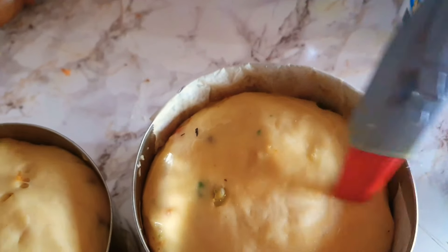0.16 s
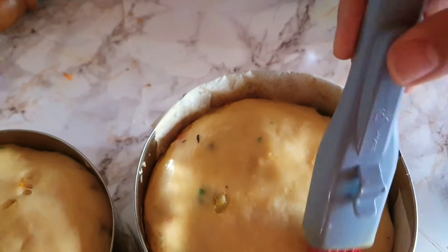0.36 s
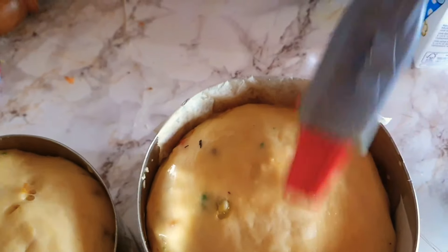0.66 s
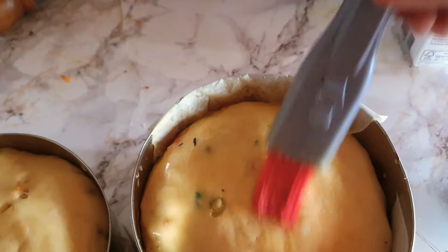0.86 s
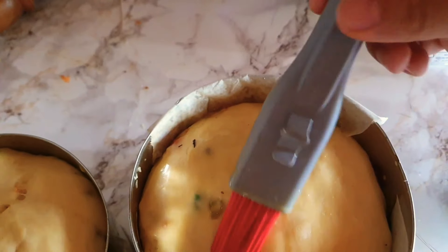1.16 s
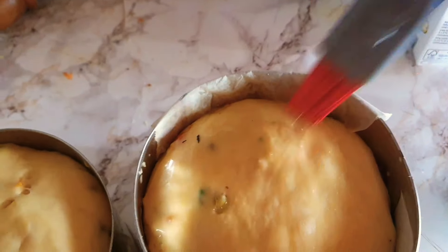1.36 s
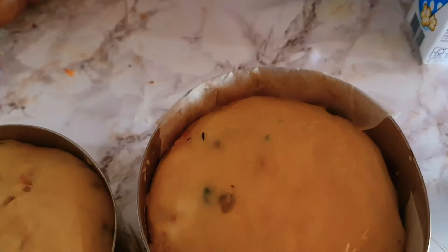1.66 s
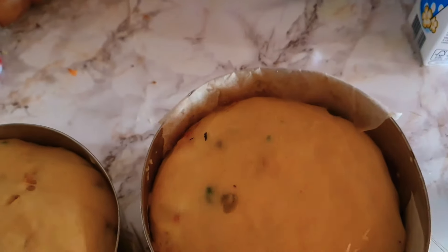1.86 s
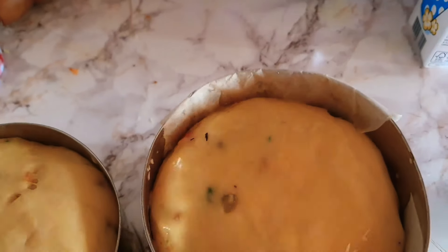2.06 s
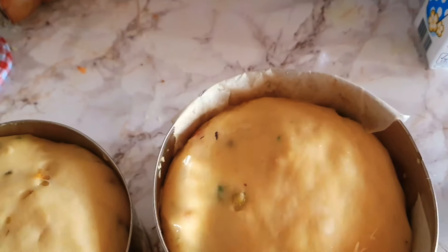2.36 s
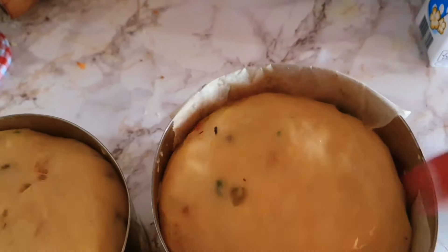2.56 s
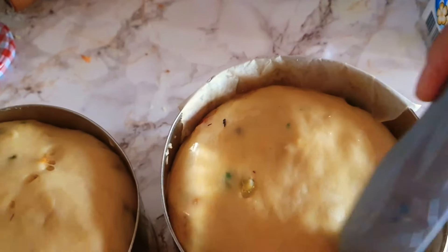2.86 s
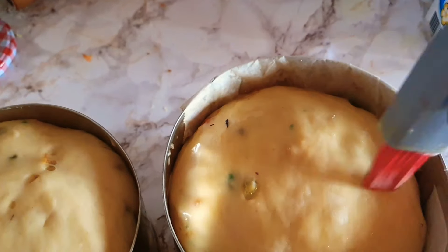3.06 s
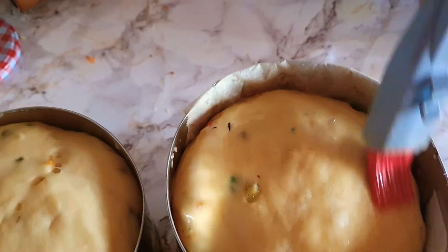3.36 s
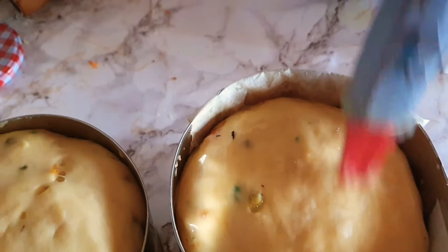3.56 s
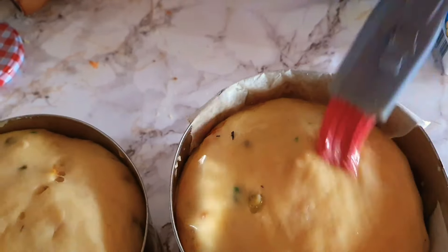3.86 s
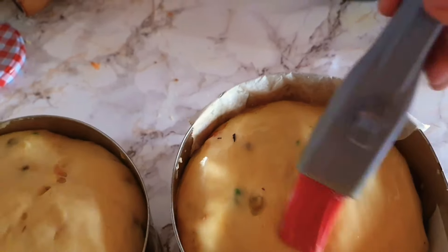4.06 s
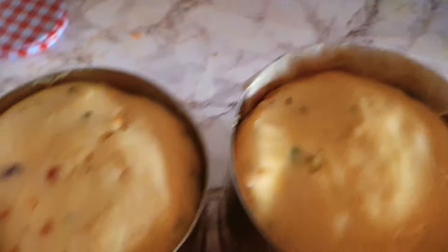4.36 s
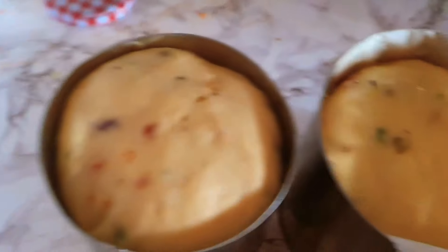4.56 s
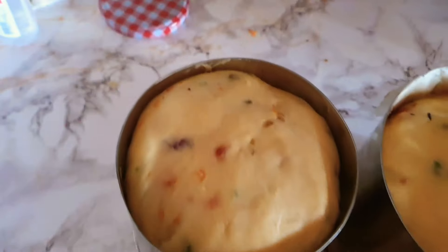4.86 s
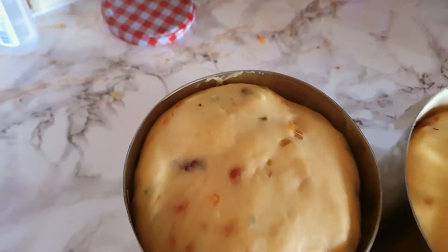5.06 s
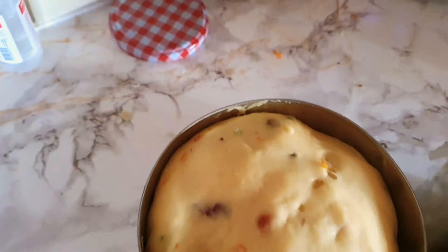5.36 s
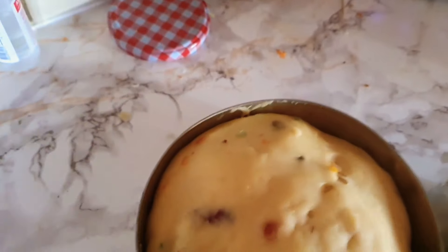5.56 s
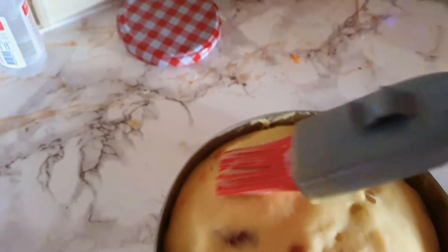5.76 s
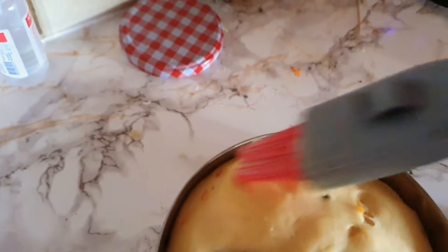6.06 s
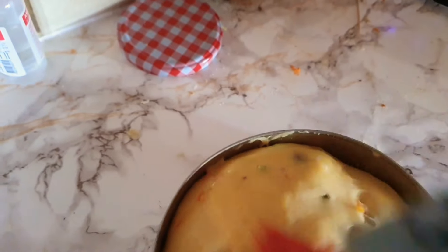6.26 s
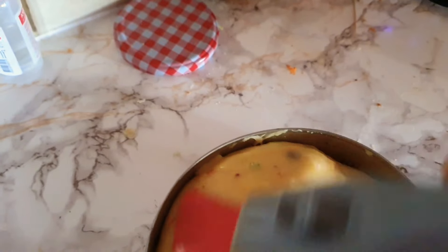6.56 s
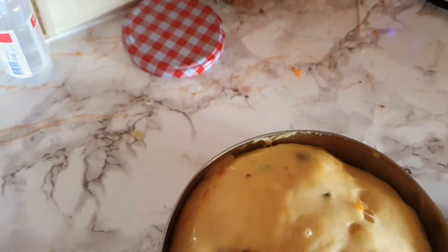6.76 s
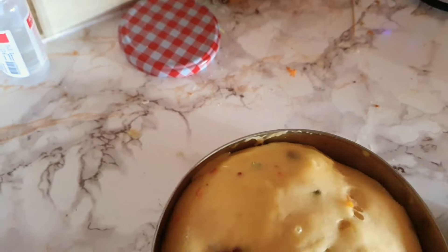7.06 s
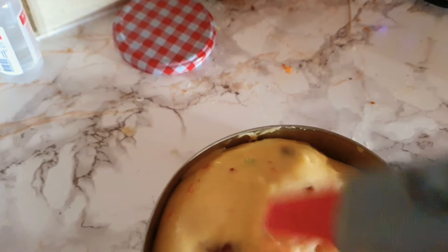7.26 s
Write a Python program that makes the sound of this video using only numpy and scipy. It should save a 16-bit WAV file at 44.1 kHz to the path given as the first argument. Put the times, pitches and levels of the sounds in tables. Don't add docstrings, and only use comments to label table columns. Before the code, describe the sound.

A soft brush strokes and dabs dough with faint hisses, paper rustles and tin ticks, over a low fridge hum, with one hard clank on stone.

```python
import sys
import numpy as np
from scipy import signal
from scipy.fft import rfft, irfft
from scipy.io import wavfile
from scipy.ndimage import uniform_filter1d

SR = 44100
rng = np.random.default_rng(int(sys.argv[2]) if len(sys.argv) > 2 else 0)


def voltage_ratio(decibels):
    exponent = np.asarray(decibels, float) / 20
    return 10 ** exponent


def output_pcm(signal):
    pcm = np.clip(np.atleast_2d(signal).T, -1, 1) * 32767
    wavfile.write(sys.argv[1], SR, np.round(pcm).astype(np.int16))


N = 325899
TIME = np.arange(N) / SR
LEFT_LAG = 10


def unit(x):
    return x / np.sqrt(np.mean(x ** 2))


def colour(x, points):
    hz = np.log(np.maximum(np.arange(x.shape[-1] // 2 + 1) * SR / x.shape[-1], 1))
    f, db = np.transpose(points)
    gain = voltage_ratio(np.interp(hz, np.log(f), db, -200, -200))
    return irfft(rfft(x) * gain, x.shape[-1])


def pair(likeness):
    f, c = np.transpose(likeness)
    hz = np.arange(N // 2 + 1) * SR / N
    c = np.clip(np.interp(np.log(hz + 1), np.log(f), c), 0, 1)
    mid, side = rfft(rng.standard_normal((2, N)))
    both = np.sqrt(1 + c) * mid + np.sqrt(1 - c) * side * np.array([[1], [-1]])
    return irfft(both, N) / np.sqrt(2)


def band(x, hz, width_hz, order=1):
    edges = [hz - width_hz / 2, hz + width_hz / 2]
    return signal.sosfilt(signal.butter(order, edges, "band", fs=SR, output="sos"), x)


def walk(rate):
    k = int(SR / rate)
    held = np.repeat(rng.standard_normal(N // k + 1), k)
    return uniform_filter1d(uniform_filter1d(held, k), k)[:N]


def pan(db):
    return voltage_ratio(np.array([db, -db]) / 2)


def add(out, s, sound):
    i = int(s * SR)
    out[:, i:i + sound.shape[1]] += sound[:, :N - i]


def fade(t, t60):
    return np.exp(-np.log(1000) * t / t60)


def steady(x, share):
    swings = np.abs(signal.hilbert(x))
    return unit(x / swings ** np.clip(share, 0, 1))


# (frequency [Hz], width [Hz], level [dB])
ROOM_NOTES = [(58.1, 17.5, -60.5), (73.1, 11.3, -48.5), (254.4, 33.7, -66), (384, 27.8, -64),
              (453, 18, -72.5), (599.8, 51, -69)]
# (frequency [Hz], level [dB])
AIR_COLOUR = [(15, -6.5), (35, -6), (52, -3), (130, -6), (300, -16), (750, -22), (1100, -38.5), (2500, -37),
              (6500, -50.5), (7600, -57.5), (11000, -51), (16000, -53)]
# (frequency [Hz], likeness [0-1])
ROOM_LIKENESS = [(30, 0.84), (70, 0.94), (200, 0.64), (400, 0.86), (700, 0.48), (1300, 0.05), (16000, 0)]
# (time [s], level [dB])
DRONE_LEVEL = [
    (0, -1),
    (2.5, -0.5),
    (4.8, -1),
    (5.6, -9),
    (7.39, -5.5),
]
HUM_HZ, HUM_DB, HUM_PAN_DB = 101.2, -49, 3
SHAFT_HZ, SHAFT_DB, SHAFT_PAN_DB = 56.74, -51.5, -3
AIR_DB = -57


def fridge():
    hum_hz = HUM_HZ + 0.615 * walk(2.767) + 0.5 * walk(22)
    hum = np.sqrt(2) * np.sin(2 * np.pi * np.cumsum(hum_hz) / SR)
    hum = hum * voltage_ratio(HUM_DB + 1.7 * walk(19) + 0.26 * walk(2.7))
    shaft_hz = SHAFT_HZ + 0.61 * walk(3.06) + 4.02 * walk(15)
    shaft = np.sqrt(2) * np.sin(2 * np.pi * np.cumsum(shaft_hz) / SR)
    shaft = shaft * voltage_ratio(SHAFT_DB + 1.5 * walk(6.6)) * pan(SHAFT_PAN_DB)[:, None]
    noise = pair(ROOM_LIKENESS)
    notes = [voltage_ratio(db) * unit(band(noise, hz, width, order=2)) for hz, width, db in ROOM_NOTES]
    notes[1] = voltage_ratio(ROOM_NOTES[1][2]) * steady(notes[1], 0.59)
    notes[3] = notes[3] * voltage_ratio(np.interp(TIME, *np.transpose(DRONE_LEVEL)))
    air = voltage_ratio(AIR_DB) * unit(colour(pair(ROOM_LIKENESS), AIR_COLOUR))
    return (hum + sum(notes)) * pan(HUM_PAN_DB)[:, None] + shaft + air


def contact(s, db, swell, fall):
    return db - 20 * np.where(TIME < s, (s - TIME) / swell, (TIME - s) / fall)


# (peak time [s], level [dB], swell [s per 20 dB], fade [s per 20 dB], sizzle [dB])
BRUSH_SWIPES = [(.508, -76.5, 0.15, 0.08, 1.5), (.564, -64.5, 0.053, 0.042, -17),
                (.892, -66, 0.065, 0.035, -7), (.968, -75, 0.052, 0.031, -5),
                (1.222, -70.5, 0.12, 0.22, -20), (1.338, -57.5, 0.015, 0.02, -21),
                (2.21, -72.5, 0.05, .06, -9), (2.59, -64, 0.052, 0.073, -12),
                (3.008, -57, 0.039, 0.066, -26), (3.44, -39, 0.02, 0.053, -16),
                (5.42, -66, 0.072, 0.17, -32), (5.54, -75, 0.027, 0.46, -19),
                (5.742, -68.5, 0.097, 0.35, -44), (5.916, -53.5, 0.029, 0.032, -9),
                (6.13, -72.5, 0.037, 0.41, -8), (6.284, -58.5, 0.043, 0.096, -9.5),
                (6.628, -48, 0.078, 0.12, -11), (6.764, -55, 0.051, 0.022, -35),
                (6.96, -62, 0.043, 0.61, -32), (7.062, -55.5, 0.096, 0.085, 0),
                (7.186, -55, 0.044, 0.038, -14.5), (7.388, -75.5, 0.0062, 0.055, 0),
                (6.58, -80, 0.026, 0.12, 12), (3.05, -55.5, 0.032, 0.03, -26)]
# (peak time [s], level [dB], swell [s per 20 dB], fade [s per 20 dB], sizzle [dB])
PAPER_RUSTLES = [(.002, -39, 0.012, 0.042, -13), (.05, -38.5, 0.11, 0.014, -9), (.08, -51.5, .03, 0.1, -10),
                 (1.635, -44, 0.0021, 0.029, -18), (1.671, -46.5, 0.0098, 0.035, -13),
                 (1.86, -46, 0.0059, 0.019, -12), (1.87, -56.5, 0.0058, 0.066, -11),
                 (2.012, -63, .004, 0.14, -20), (2.076, -57, .004, 0.025, -45),
                 (2.69, -51, 0.0031, 0.37, -20), (2.715, -41, 0.017, 0.096, -14.5),
                 (2.744, -43.5, 0.011, 0.03, -14), (2.822, -49, 0.041, 0.004, -4.5),
                 (2.89, -96, 0.028, 0.12, 10), (2.972, -43, 0.027, 0.011, -9),
                 (3.515, -70.5, 0.02, 0.29, -19), (4.54, -63, 0.0028, 0.017, 15),
                 (4.595, -48.5, 0.041, 0.029, -4), (4.64, -61.5, 0.058, 0.52, -6.5),
                 (4.978, -59.5, 0.024, 0.067, -23), (5.008, -74, 0.026, 0.083, 4)]
SWIPE_BODY_DB, RUSTLE_BODY_DB = -4.5, -11
LIFT_S = 4.87


def touch():
    out = np.full((3, N), 1e-9)
    for table, body_db in ((BRUSH_SWIPES, SWIPE_BODY_DB), (PAPER_RUSTLES, RUSTLE_BODY_DB)):
        for s, db, swell, fall, sizzle_db in table:
            damped = 100 * np.clip(TIME - LIFT_S, 0, None) * (s < LIFT_S)
            part_db = np.array([[0], [sizzle_db], [body_db]])
            out += voltage_ratio(contact(s, db, swell, fall) - damped + part_db)
    return out


# (time [s], left minus right [dB], note of the hollow under it [Hz])
HAND_PATH = [(0, 8, 3056), (1.22, 19.5, 3450), (1.34, 10.5, 2600), (1.66, 0, 3075), (2.072, 15, 2790),
             (2.601, 8, 3360), (3.06, 6.5, 2440), (3.2, 19, 3000), (3.438, 10.5, 3290), (4.55, 8.5, 2607),
             (4.999, 14, 2760), (5.451, 11.5, 3370), (5.749, 18.5, 2700), (5.919, 26.5, 3000),
             (6.082, 24, 2565), (6.7, 14, 2922), (6.869, 14, 2600), (7.103, 17, 2893)]
# (frequency [Hz], level [dB])
RUB_COLOUR = [(1000, -67), (1700, -14), (2130, -3.5), (2340, -2.5), (2930, -5), (3910, -6), (5420, -12),
              (6420, -8), (7600, -27.5), (9880, -62), (16700, -120)]
# (frequency [Hz], level [dB])
SIZZLE_COLOUR = [(7000, -22), (8300, 6), (11000, 12), (14500, 5), (16000, -6)]
# (frequency [Hz], level [dB])
BODY_COLOUR = [(500, -20), (750, -4), (1100, 1.5), (1700, -3), (2300, -25)]
# (peak time [s], level [dB], swell [s per 20
# dB], fade [s per 20 dB])
SLEEVE_RUBS = [
    (3.13, -71, .15, 0.21),
    (4.788, -71, 0.039, 0.049),
    (5.74, -65, 0.034, 0.03),
    (6.11, -76, 0.03, 0.13),
    (6.25, -69, 0.093, 0.081),
    (6.55, -66, 0.042, 0.12),
    (6.89, -60.5, 0.023, 0.052),
    (2.049, -75, .04, 0.034),
]


def strokes():
    s, *columns = np.transpose(HAND_PATH)
    side, hollow_hz = (np.interp(TIME, s, column) for column in columns)
    level, sizzle, body = touch()
    clicks = (rng.random(N) < 400 / SR) * voltage_ratio(1.8 * rng.exponential(size=N)) * rng.standard_normal(N)
    hiss = pair([(500, 0.7), (3000, 0.6), (8000, 0.2)])
    slip = (hiss + 0.3 * unit(clicks)) * voltage_ratio(3 * walk(110))
    turn = 2 * np.pi * np.cumsum(hollow_hz) / SR
    slow = colour(rng.standard_normal((2, 2, N)), [(1, -5), (150, -8), (350, -18.5), (900, -18.5)])
    slow = slow + 0.52 * slow[:, :1]
    hollow = unit(slow[0] * np.cos(turn) + slow[1] * np.sin(turn))
    loud_db = 20 * np.log10(level) + 55.0
    bright_db = 20 * np.log10(sizzle / level) + 16.5
    share = np.clip(0.3 - 0.0058 * loud_db - 0.048 * bright_db, 0.12, 0.93)
    rub = np.sqrt(1 - share) * unit(colour(slip, RUB_COLOUR)) + np.sqrt(share) * hollow
    rub = level * rub * pan(side)
    rub = rub + sum(voltage_ratio(contact(*row)) for row in SLEEVE_RUBS) * hollow * pan(side)
    rub = rub + sizzle * voltage_ratio(2.2 * walk(40)) * unit(colour(slip, SIZZLE_COLOUR)) * pan(0.3 * side)
    rub = rub + body * unit(colour(slip, BODY_COLOUR)) * pan(0.45 * side)
    return np.array([np.roll(rub[0], LEFT_LAG), rub[1]]) * voltage_ratio(-5.5)


# (time [s], peak level [dB], pitch [Hz], ring time to -60 dB [s], left minus right [dB])
TIN_KNOCKS = [(0.014, -43, 950, 0.17, 0), (0.022, -38.5, 769, 0.063, 5), (0.039, -33.5, 734, 0.026, 0),
              (1.632, -43, 378, 0.021, 0), (1.668, -51, 359.5, 0.17, -1), (1.824, -43, 337, 0.097, 5),
              (1.854, -49, 722, 0.094, 4), (2.011, -40, 338, 0.081, 2), (2.012, -48.5, 696, 0.06, 13),
              (2.715, -38, 1114, 0.039, 5), (2.95, -32.5, 728, 0.028, 7.5), (3.433, -53, 905, 0.05, -12),
              (6.92, -101, 252, 0.08, -1.0)]


def knocks():
    out, t = np.zeros((2, N)), TIME[:8000]
    for s, db, hz, t60, side_db in TIN_KNOCKS:
        ring = np.sin(2 * np.pi * hz * t)
        ring = ring + 0.12 * np.sin(2 * np.pi * hz * 1.9 * t) * fade(t, t60)
        ring = ring + 0.35 * unit(band(rng.standard_normal(len(t)), 375, 560, order=2))
        push = 1 - np.exp(-t / 0.0018)
        add(out, s, ring * fade(t, t60) * push * voltage_ratio(db + 2.0) * pan(side_db)[:, None])
    return out


# (time [s], peak level [dB], pitch [Hz], ring time to -60 dB [s], left minus right [dB])
PAPER_SNAPS = [(0.888, -66, 6350, 0.013, 9), (1.371, -62, 6550, 0.012, 15), (2.928, -64, 6200, 0.013, 3),
               (2.9744, -77, 5660, 0.013, 5), (4.541, -41.5, 6820, 0.0088, -7),
               (4.542, -60, 8120, 0.09, -6), (4.586, -60, 10880, .05, -5), (4.792, -56.5, 6230, 0.032, 8),
               (4.79, -61.5, 11000, 0.044, 0), (4.567, -43.5, 6240, 0.022, 4),
               (4.9653, -45.5, 11900, 0.026, -0.5), (4.999, -37.5, 9450, 0.0085, -6),
               (5.005, -45, 10820, 0.015, -5), (4.5384, -41, 10100, 0.01, -3), (6.514, -66, 9760, 0.014, 8),
               (6.6665, -48, 5770, 0.0097, -8)]
SNAP_SPREAD = 0.52


def snaps():
    out, t = np.zeros((2, N)), TIME[:4000]
    for s, db, hz, t60, side_db in PAPER_SNAPS:
        width_hz = min(hz * 0.3, SNAP_SPREAD / t60 ** 2)
        click = unit(band(rng.standard_normal((2, len(t))), hz, width_hz, order=2))
        add(out, s, click * fade(t, t60) * voltage_ratio(db - 1.5) * pan(side_db)[:, None])
    return out


# (time [s], peak level [dB], pitch [Hz], bright edge [dB])
TIN_TICKS = [(1.3463, -73, 2210, -17), (1.6312, -52, 1560, -32), (1.669, -45, 1830, -20),
             (1.683, -39.5, 1490, -22), (1.6975, -49.5, 1480, -33), (1.8237, -58, 2640, -22),
             (1.8549, -32, 1460, -11), (2.0069, -53.5, 2830, -16), (2.0517, -53, 2760, -25),
             (2.0731, -42, 2510, -19), (2.687, -42.5, 3365, -26), (2.7162, -39, 1950, -25),
             (2.8082, -44, 3650, -18), (2.8204, -60, 3360, -8.5), (2.9526, -42.5, 3100, -27),
             (2.9614, -49, 2360, -27), (3.396, -62, 2360, -30), (3.413, -52, 2760, -30),
             (3.4286, -44, 3510, -25), (3.449, -39, 1990, -20), (3.516, -74, 3800, -25),
             (3.4335, -30.5, 3420, -32), (4.5382, -50, 2524, 7), (4.5659, -47.5, 2740, -32),
             (4.59, -54, 2497, -15), (4.7895, -52.5, 2680, -6), (4.964, -57, 2680, 0),
             (4.9784, -48.5, 1680, -10), (5.5348, -64.5, 3350, -20), (5.7325, -57, 2330, -33),
             (5.919, -41.5, 4060, -25), (5.925, -49, 4630, -27), (6.1055, -62, 2680, -39),
             (6.8855, -60, 2504, -30), (6.1275, -68, 2730, -30), (6.2716, -50, 2710, -20),
             (6.607, -48, 2960, -17), (6.6659, -41.5, 2820, -0.5), (6.9696, -53, 2930, -22),
             (7.0091, -46.5, 2878, -15), (7.166, -55, 2580, -15), (0.9652, -63, 2150, -20),
             (7.359, -68, 1440, -4)]
TICK_T60_S, TICK_SHORTER, TICK_PAN_DB, TICK_CENTRING = 0.048, 0.19, 11.5, 0.21


def ticks():
    out, t = np.zeros((2, N)), TIME[:6000]
    lagged = t - np.array([[LEFT_LAG / SR], [0]])
    for s, db, hz, bright_db in TIN_TICKS:
        t60 = TICK_T60_S * voltage_ratio(-TICK_SHORTER * (db + 46.0))
        side_db = TICK_PAN_DB - TICK_CENTRING * (db + 38)
        crack = rng.standard_normal((3, len(t)))
        crack = np.array([crack[0], np.roll(crack[0], -LEFT_LAG)]) + 1.06 * crack[1:]
        ring = 1.37 * np.sin(2 * np.pi * hz * lagged) * fade(t, 3.6 * t60)
        ring = ring + 0.64 * unit(band(crack, hz, hz * 0.36, order=2))
        ring = ring + 0.56 * unit(band(crack, 2270, 3050, order=2))
        ring = ring * fade(t, t60) * pan(side_db)[:, None]
        edge = voltage_ratio(bright_db) * unit(band(crack, 11200, 9100, order=2)) * fade(t, 0.75 * t60)
        add(out, s, (ring + edge * pan(-0.97)[:, None]) * voltage_ratio(db - 8.5))
    return out


# (frequency [Hz], level [dB], ring time to -60 dB [s])
COUNTER_RINGS = [(251, -3, 0.15), (446.5, -7.5, 0.21), (690, 8, 0.068), (722, 2.5, 0.053),
                 (586, -11, 0.058), (1170, -14, 0.14), (1339, -1, 0.086), (1770, 1, 0.034),
                 (2230, -26, 0.065), (2760, 9.5, 0.026), (2960, -16, 0.1), (185, -28, 0.14),
                 (4370, -13, 0.036), (825, -2, 0.05)]
# (frequency [Hz], level [dB], ring time to -60 dB [s])
GLASS_RINGS = [(3302, 0, .31), (3323, -10, .3), (7429, -23, .18), (8879, -14, .14)]
# (frequency [Hz], level [dB])
CRACK_COLOUR = [(88, -47), (150, -14.5), (716, -7.5), (998, -19.5), (1360, -13), (2400, -20.5), (3350, -16),
                (3700, -26), (9080, -48.5), (11300, -43), (12200, -75), (13200, -48), (16000, -53)]
CLANK_S, CLANK_DB, GLASS_DB = 5.2512, -25.5, -7
RISE_CYCLES = 2.14


def clank():
    ring, crack, t = np.zeros((2, N)), np.zeros((2, N)), TIME[:30000]
    rise = (1 - np.exp(-t / 0.001)) * voltage_ratio(CLANK_DB)
    glass = [(hz, db + GLASS_DB, t60) for hz, db, t60 in GLASS_RINGS]
    for k, (hz, db, t60) in enumerate(list(COUNTER_RINGS) + glass):
        lag = np.array([[2 * np.pi * hz * LEFT_LAG / SR * (900 < hz < 6000)], [0]])
        swing = 1 - np.exp(-t * hz / RISE_CYCLES)
        tone = (-1) ** k * voltage_ratio(db) * np.sin(2 * np.pi * hz * t - lag)
        add(ring, CLANK_S, tone * fade(t, t60) * rise * swing)
    noise = rng.standard_normal((3, len(t)))
    noise = np.array([noise[0], np.roll(noise[0], -LEFT_LAG)]) + 0.82 * noise[1:]
    noise = unit(colour(noise, CRACK_COLOUR))
    blow = noise * (fade(t, 0.039) + voltage_ratio(-14.5) * fade(t, 0.29)) * voltage_ratio(5.5) * rise
    add(crack, CLANK_S, blow)
    add(crack, CLANK_S + 0.018, blow * voltage_ratio(-30))
    return ring, crack


KITCHEN_T60_S, KITCHEN_DB = 0.18, -10


def kitchen(x):
    t = TIME[:20000]
    noise = rng.standard_normal((2, len(t)))
    low = uniform_filter1d(noise, size=6)
    high = (noise - low) * 0.5
    tail = low * fade(t, KITCHEN_T60_S) + high * fade(t, 1.15 * KITCHEN_T60_S)
    tail = tail * (t > 0.003)
    tail = tail / np.sqrt(np.sum(tail ** 2, axis=1, keepdims=True))
    return voltage_ratio(KITCHEN_DB) * signal.fftconvolve(x.mean(axis=0)[None], tail, axes=1)[:, :N]


# (frequency [Hz], gained left and lost right [dB])
PHONE_SHADOW = [(1, 4), (700, -1), (1200, 2.5), (5500, 3.5), (8000, 11), (22050, -8)]


def shade(x):
    hz, db = np.transpose(PHONE_SHADOW)
    left = colour(x[0], np.transpose([hz, db]))
    right = colour(x[1], np.transpose([hz, -db]))
    return np.array([left, right])


def scene():
    hum, brush = fridge(), strokes()
    near = knocks() + snaps() + ticks()
    ring, crack = clank()
    echo = kitchen(1.05 * near + crack + 0.072 * ring)
    return near + shade(ring + crack + echo) + brush + hum


def top_cut(x):
    return signal.sosfilt(signal.butter(12, 16460, fs=SR, output="sos"), x)


def record(dry):
    mix = signal.sosfilt(signal.ellip(8, 0.1, 50, 15850, fs=SR, output="sos"), dry)
    return top_cut(mix)


dry = scene()
out = record(dry)
output_pcm(out)
```